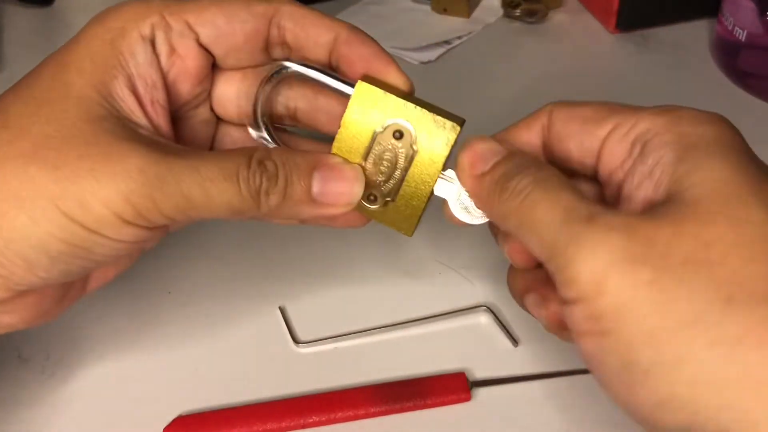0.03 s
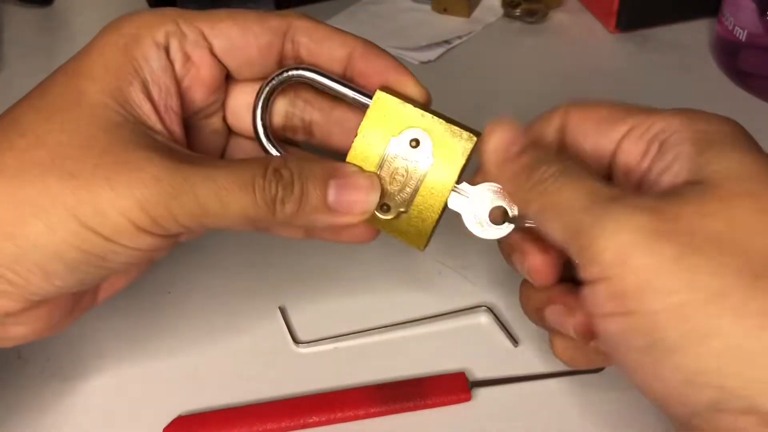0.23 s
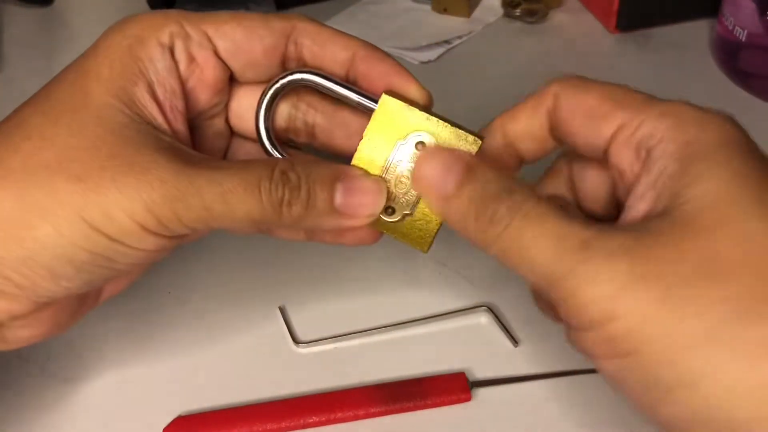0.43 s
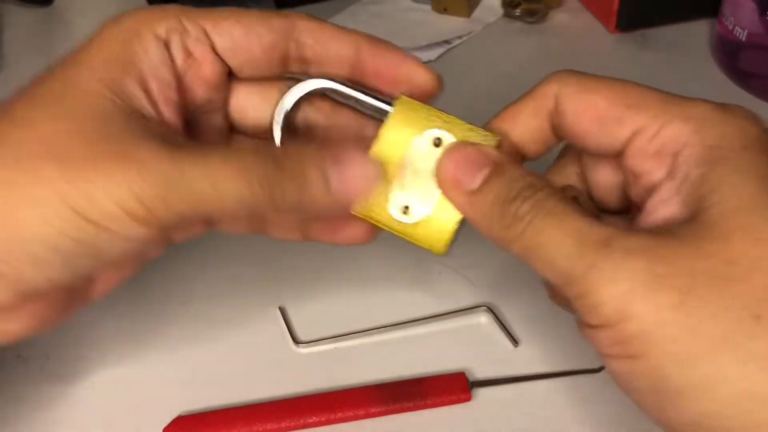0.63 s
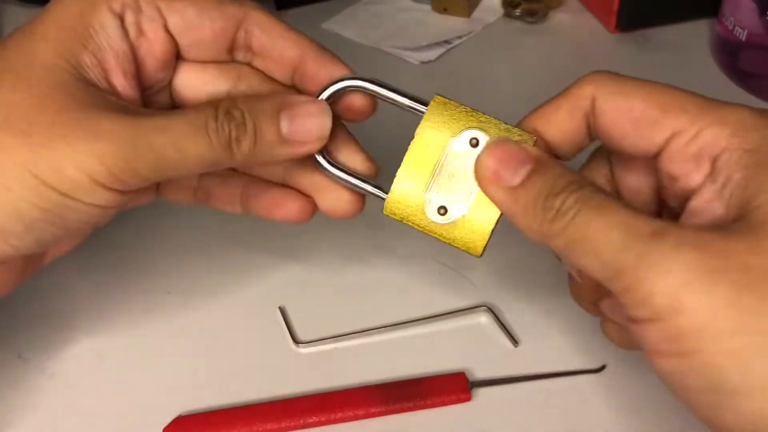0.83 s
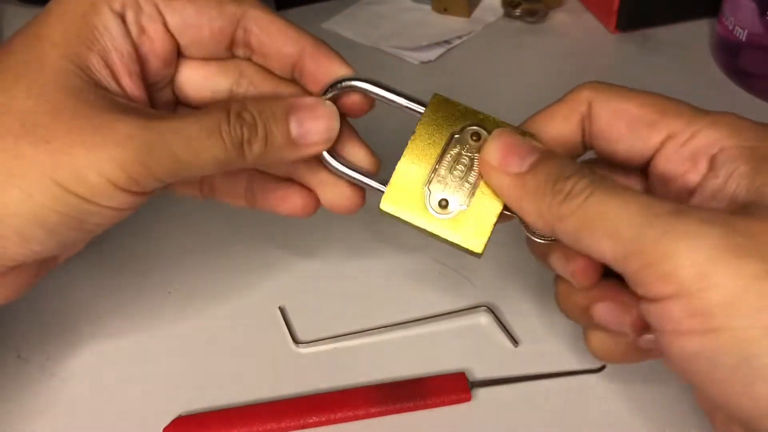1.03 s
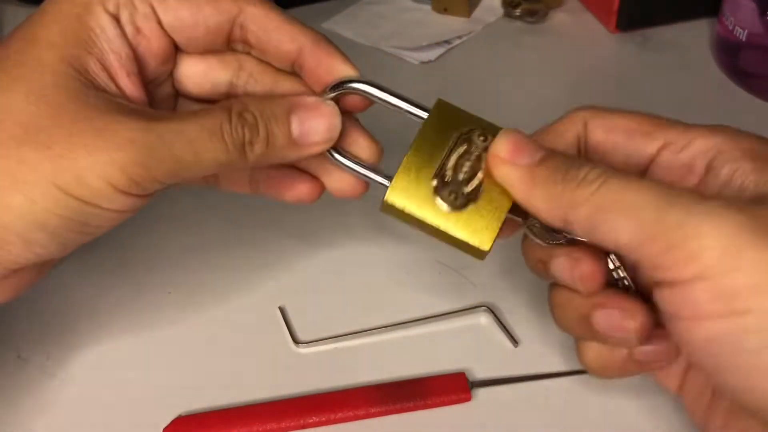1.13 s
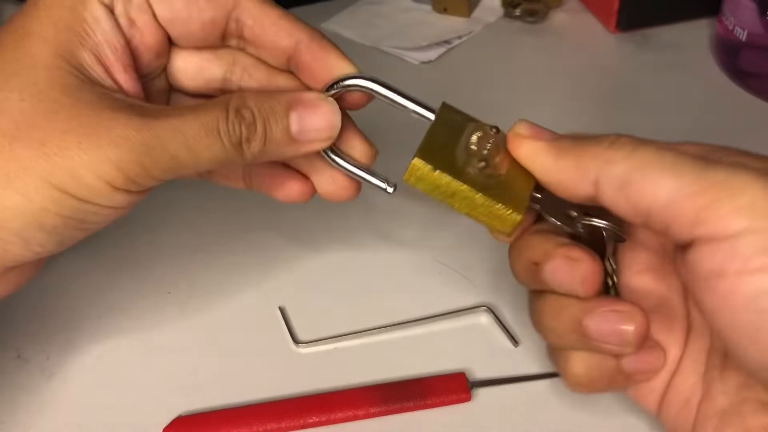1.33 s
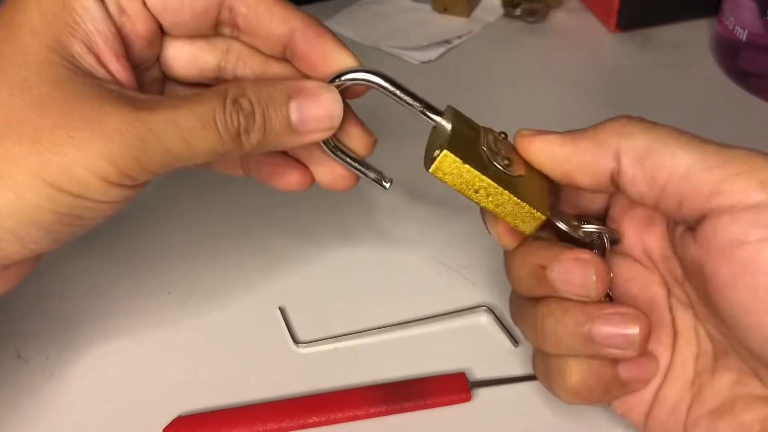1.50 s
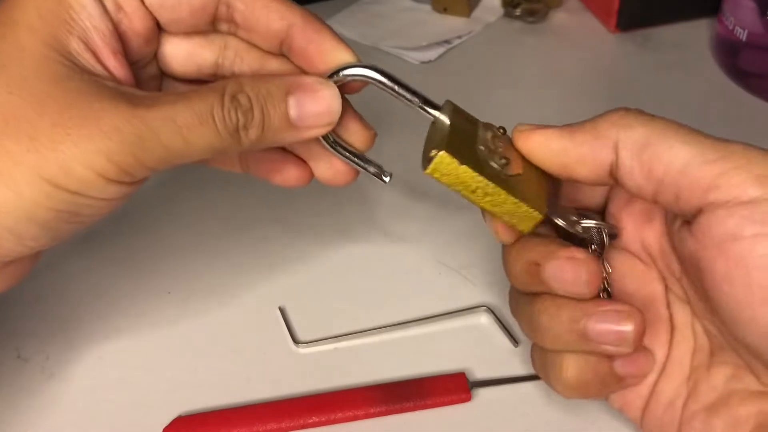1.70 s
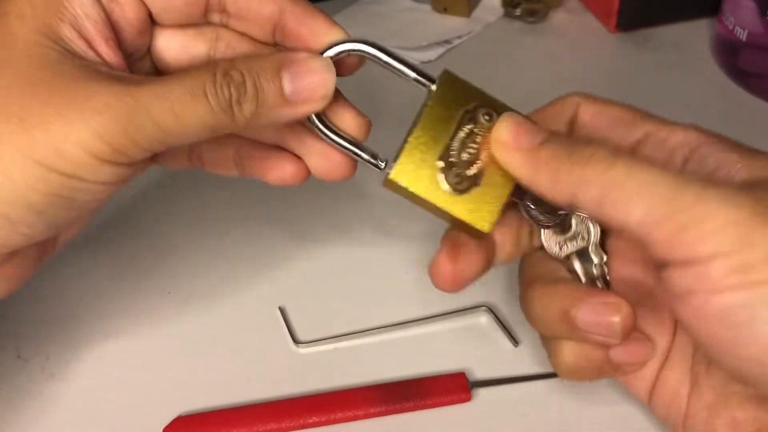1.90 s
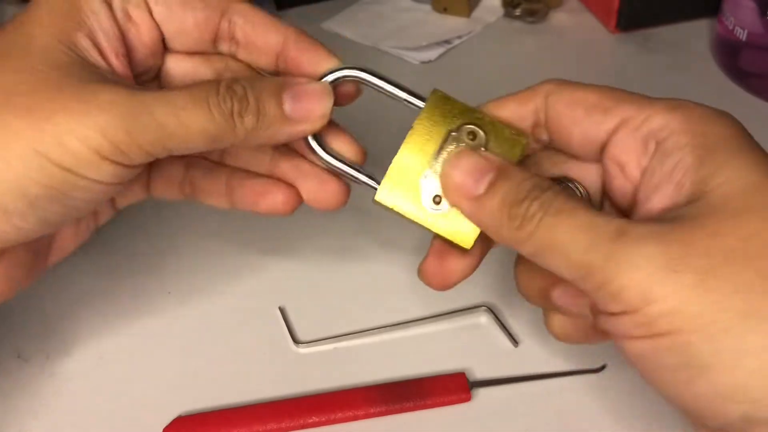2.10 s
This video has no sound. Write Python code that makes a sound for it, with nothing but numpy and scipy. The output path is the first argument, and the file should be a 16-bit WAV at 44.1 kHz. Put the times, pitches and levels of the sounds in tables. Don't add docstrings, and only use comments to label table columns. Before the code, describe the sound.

A small brass padlock snaps at 0.07 s, very bright, hard and short, and the room answers with a brief splashy tail. Faint key ticks and a slide follow at 0.26 s, firmer key taps at 1.0 s, a shackle tick at 1.2 s, then thin steel ticks and scrapes from 1.76 to 2.1 s. Soft low table bumps come at 0.5, 1.0, 1.36 and 1.54 s over faint fan hum and hiss.

```python
import sys
import numpy as np
from scipy import signal
from scipy.fft import rfft, irfft
from scipy.io import wavfile
from scipy.ndimage import uniform_filter1d

SR = 44100
rng = np.random.default_rng(int(sys.argv[2]) if len(sys.argv) > 2 else 0)


def dump_mix(stems):
    frames = np.atleast_2d(stems).T
    limited = np.clip(frames, -1, 1)
    pcm = np.round(limited * 32767).astype(np.int16)
    wavfile.write(sys.argv[1], SR, pcm)


def volts_from_db(level):
    exponent = np.asarray(level, float) / 20
    return 10 ** exponent


N = 94815
CREST_S = .0668

# f/Hz, level/dB, t60/s
BRASS_MODES = [(3400, -9, .007), (5100, -8, 0.005), (5400, -8.5, 0.0072), (6050, -11, .008),
               (8960, -5.5, 0.0072), (10500, -10.5, 0.0058), (11500, -5, 0.011), (12800, -6.5, .01),
               (14530, -6.5, 0.0045)]


def level(x, db):
    return x * volts_from_db(db) / np.sqrt(np.mean(x ** 2) + 1e-18)


def band(x, hz, width_hz):
    hz = min(hz, .45 * SR)
    return signal.lfilter(*signal.iirpeak(hz, hz / np.clip(width_hz, 5, .4 * SR), fs=SR), x)


def high_pass(x, hz):
    return signal.sosfilt(signal.butter(3, hz, "high", fs=SR, output="sos"), x)


def colour(x, points):
    points = np.array(points)
    f = np.fft.rfftfreq(len(x), 1 / SR) + 1
    gain_db = np.interp(np.log(f), np.log(points[:, 0]), points[:, 1])
    return irfft(rfft(x) * volts_from_db(gain_db), len(x))


def fall(t, t60):
    return (t >= 0) * np.exp(-np.log(1000) * np.maximum(t, 0) / max(t60, 1e-4))


def add(out, x, s):
    i = int(s * SR)
    out[i:i + len(x)] += x[:max(N - i, 0)]


def ticks(contacts, modes, ring_db, crack_t60_s=.011, strike=2):
    out = np.zeros(N)
    t = np.arange(SR // 8) / SR
    mode_hz, mode_db, mode_t60 = np.array(modes).T
    for s, db, hz, share in contacts:
        width_hz = hz * share
        crack = ((t == 0) * strike + rng.standard_normal(len(t))) * fall(t, crack_t60_s)
        for w in (width_hz, width_hz, 2.5 * width_hz):
            crack = band(crack, hz, w)
        luck = rng.standard_normal(len(mode_hz))
        near = 1 / (1 + (2 * np.log(mode_hz / hz) / share) ** 4)
        gain = near * np.sign(luck) * volts_from_db(mode_db + 3 * luck + ring_db)
        ring = sum(g * np.sin(2 * np.pi * f * t) * fall(t, d) for g, f, d in zip(gain, mode_hz, mode_t60))
        add(out, volts_from_db(db) * (crack / np.abs(crack).max() + ring), s)
    return out


def air():
    # f/Hz, level/dB per Hz
    rumble = [(25, -25.5), (60, -17.5), (170, 0.5), (500, -9.5), (1200, -11), (2600, -22.5), (6000, -37.5),
              (16000, -57.5)]
    # f/Hz, width/Hz, level/dB
    humps = [(58, 27, -65), (132.1, 22, -57.5), (184.6, 17.6, -59), (289.5, 37, -57.5), (384.9, 74, -61),
             (601, 51, -62.5), (1020, 143, -67)]
    out = level(colour(rng.standard_normal(N), rumble), -49.5)
    for hz, width_hz, db in humps:
        flicker = level(uniform_filter1d(rng.standard_normal(N), size=4000), 0)
        hump = band(band(rng.standard_normal(N), hz, width_hz), hz, width_hz)
        out = out + level(hump, db) * volts_from_db(2.5 * flicker)
    whine = volts_from_db(-86) * np.sin(2 * np.pi * 14540 * np.arange(N) / SR)
    hiss = level(rng.standard_normal(N), -77)
    return out + whine + hiss


def key():
    # t/s, peak level/dB, colour f/Hz, bandwidth/share of f
    taps = [(.0408, -47, 13500, .4), (.0435, -42, 12000, 1.6), (.0468, -76, 11500, 0.81),
            (.0500, -55, 7800, 0.45), (.0550, -44, 9000, 0.73), (.2575, -50, 8850, 0.92),
            (.2620, -42.5, 6140, 0.79), (.2648, -28.5, 14700, 0.18), (.2650, -37.5, 8530, 1.4),
            (.308, -60, 12700, 0.17), (.376, -66, 11960, 0.85), (.420, -58, 13240, .7),
            (.517, -62.5, 11970, .8), (.9948, -34, 3200, 0.29), (.9950, -31, 5630, 0.23),
            (.9953, -31, 8970, 0.11), (.9956, -35, 11600, 0.3), (.9950, -47, 2220, 0.28),
            (.9983, -41.5, 3280, 0.3), (.9983, -45, 5250, 0.22), (.9985, -45, 8900, 0.16),
            (1.0015, -48.5, 8800, .15), (1.0015, -56, 13500, .5), (1.013, -56, 3200, 0.13),
            (1.041, -58, 12800, .15), (1.0075, -48, 7500, .3), (1.0072, -54, 5200, 0.22),
            (1.0073, -55, 12500, .15), (1.1100, -51, 5600, 0.14), (1.1104, -55.5, 8900, 0.18)]
    return ticks(taps, BRASS_MODES, ring_db=-9)


def latch():
    # t/s, peak level/dB, colour f/Hz,
    # bandwidth/share of f
    hits = [(.0601, -27, 8000, 1.2), (.0637, -7, 14200, .3), (.0645, -9, 12000, .3),
            (.0662, 2.5, 11000, 1.1), (.0667, 3, 11600, .8), (.0690, -10, 12000, .3),
            (.0690, -17, 6200, .25), (.0722, -23, 7500, .3), (.0660, -27, 2000, .15),
            (.0664, -29, 2600, .15), (.0650, -28, 3500, .2), (.0700, -20, 15300, .1),
            (.0720, -23, 15300, .1), (.0712, -23, 6200, .2), (.0737, -27, 7400, .15),
            (.0797, -30, 6300, .12), (.0805, -25, 12400, .15), (.0845, -27, 12600, .1)]
    # f/Hz, width/Hz, level/dB
    resonances = [(2000, 450, -26.5), (2520, 120, -27.5), (3530, 100, -20), (4010, 170, -21),
                  (6140, 250, -9), (7500, 100, -14.5), (8770, 120, -8), (10300, 100, -12.5),
                  (11800, 170, -7), (11270, 110, -5), (12240, 60, 4.5), (13000, 91, -13), (14300, 83, -8),
                  (14700, 130, -6)]
    start_s, widen = .0599, 2.5
    t = np.arange(N) / SR
    push = rng.standard_normal(N)
    body = level(sum(volts_from_db(db) * band(push, hz, w * widen) for hz, w, db in resonances), 0)
    body = body + level(band(band(push, 9000, 12000), 9000, 12000), -11)
    body = high_pass(body, 2600)
    rise = np.clip((t - start_s) / (CREST_S - start_s), 0, 1)
    swell = (t > start_s) * volts_from_db(19 * (rise - 1))
    chatter = volts_from_db(-13) * swell * fall(np.maximum(t - CREST_S, 0), .021) * body
    contacts = ticks(hits, BRASS_MODES, ring_db=-13, crack_t60_s=.0025, strike=5)
    return high_pass(chatter + contacts, 1500)


def room_reply(x, tail, t):
    build = np.clip(t / .00062, 0, 1)
    tail = tail * (fall(t, .21) + volts_from_db(-16.5) * fall(t, .54)) * build
    return signal.fftconvolve(x, tail * volts_from_db(-14.5) / np.sqrt(np.sum(tail ** 2)))[:N]


def room(x, flat=False):
    # f/Hz, level/dB
    walls = [(1800, -39), (2900, -17), (3700, -3.5), (6000, -5), (9500, -8), (12000, -1.5), (14000, -5),
             (16000, -8.5)]
    # f/Hz, width/Hz, level/dB
    long_rings = [(3730, 110, -11), (4340, 120, -13), (5900, 350, -6), (6900, 200, -7), (7600, 250, -9),
                  (10900, 200, -8), (11300, 130, -4), (12090, 70, 0), (12650, 250, -5), (14200, 200, -9),
                  (15000, 200, -7), (15650, 120, -9)]
    t = np.arange(SR // 2) / SR - .013
    tail = rng.standard_normal(len(t))
    if not flat:
        rings = sum(volts_from_db(db) * level(band(tail, hz, w), 0) for hz, w, db in long_rings)
        patches = level(uniform_filter1d(rng.standard_normal(len(t)), size=300), 0)
        tail = (level(colour(tail, walls), 0) + level(rings, -7)) * volts_from_db(.9 * patches)
    return room_reply(x, tail, t)


def scrapes():
    # start t/s, length/s, level/dB, colour f/Hz
    slides = [
        (0.251, 0.068, -66.5, 10950),
        (0.597, 0.095, -75.5, 9930),
        (1.003, .05, -72, 8000),
        (1.25, .055, -76, 11000),
        (1.768, 0.03, -66, 11000),
        (1.856, 0.032, -66.5, 9000),
        (1.917, 0.053, -66, 12000),
        (1.951, 0.018, -54.5, 9000),
        (1.972, 0.098, -66.5, 10000),
    ]
    clicks_per_s, scatter_db = 3500, 2
    out = np.zeros(N)
    for s, length, db, hz in slides:
        chance, size = rng.random((2, int(length * SR)))
        sign = np.sign(size % .1 - .05)
        grains = (chance < clicks_per_s / SR) * volts_from_db(-scatter_db * np.log(size + 1e-9)) * sign
        x = band(grains, hz, hz)
        rub = level(band(x, hz, hz), 0)
        ring = sum(level(band(x, f, 400), -12) for f in (12800, 8850))
        add(out, level(rub + ring, db) * np.hanning(len(x)) ** .4, s)
    return out


def bumps():
    # t/s, level/dB, f/Hz, t60/s
    knocks = [
        (1.001, -27.5, 230, 0.027),
        (1.357, -30, 158, 0.058),
        (.49, -35, 194, 0.086),
        (3.1, -33.5, 190, 0.043),
        (1.541, -29.5, 131, 0.06),
    ]
    t = np.arange(N) / SR
    out = np.zeros(N)
    for s, db, hz, t60 in knocks:
        onset = np.clip((t - s) * hz, 0, 1)
        out = out + volts_from_db(db) * np.sin(2 * np.pi * hz * (t - s)) * fall(t - s, t60) * onset
    return out


def shackle():
    # t/s, peak level/dB, colour f/Hz, bandwidth/share of f
    taps = [(1.2085, -40, 12550, 0.51), (1.2090, -48.5, 4870, 0.32), (1.2087, -58.5, 8700, 0.47),
            (1.260, -68, 12700, 0.19), (1.291, -65, 12300, 0.17), (1.7587, -45, 14000, 0.18),
            (1.7615, -48, 14000, 0.23), (1.7655, -42.5, 13500, 0.074), (1.7657, -45.5, 6600, 0.36),
            (1.770, -56, 8900, .1), (1.7735, -55, 13000, .12), (1.774, -51, 5600, .4),
            (1.776, -55, 12800, 0.18), (1.777, -54, 8960, 0.15), (1.784, -50, 15300, 0.14),
            (1.805, -59, 12700, .12), (1.8255, -42, 12900, 0.18), (1.824, -51, 15600, .15),
            (1.826, -55, 4300, 0.18), (1.8315, -53, 13000, .3), (1.8318, -55, 8700, .15),
            (1.8262, -50.5, 8660, 0.2), (1.8545, -49, 13500, 0.25), (1.8560, -55, 4400, 0.15),
            (1.856, -60, 10060, 0.055), (1.8552, -51, 9200, .3), (1.870, -60, 8900, .12),
            (1.924, -63, 12800, .1), (1.934, -61.5, 12000, .4), (1.9407, -58, 12800, .15),
            (1.9452, -54, 15600, .04), (1.949, -56, 12800, .1), (1.953, -52, 9500, 0.44),
            (1.9575, -36.5, 13500, 0.18), (1.9577, -46.5, 4240, 0.21), (1.9580, -41.5, 8900, 0.29),
            (1.9645, -47.5, 12700, .3), (1.9647, -44, 8100, 0.34), (1.985, -59, 8000, .9),
            (1.993, -57, 11000, .6), (2.008, -56, 10300, .15), (2.0145, -47, 13000, .3),
            (2.0147, -42, 8100, 0.28), (2.030, -58, 8100, 0.4), (2.039, -50.5, 10400, 0.21),
            (2.0392, -62, 13400, .2), (2.050, -54, 10500, 0.36), (2.0502, -56, 15200, .15),
            (2.0504, -57, 6500, 0.61), (2.081, -64, 11910, .9), (2.129, -64, 10300, .2)]
    # f/Hz, level/dB, t60/s
    steel_modes = [(4340, -11.5, 0.014), (7100, -2, 0.0088), (8160, -1, 0.012), (8800, -5, 0.037),
                   (9700, -8.5, 0.015), (12700, 5, 0.017), (12890, -15, .06), (13240, 0, 0.0098),
                   (15500, 2, .01)]
    return ticks(taps, steel_modes, ring_db=-8)


def scene():
    small = key() + scrapes() + shackle()
    click = volts_from_db(12) * (np.arange(N) == int(CREST_S * SR))
    reply = room(click) + room(volts_from_db(-11) * small, flat=True)
    return (air() + latch() + small + reply + bumps())[None]


def low_pass(x):
    return signal.sosfilt(signal.butter(12, 16630, fs=SR, output="sos"), x)


def record(dry):
    release_s, limit_db, duck_ratio = .008, -27, .3
    k = np.exp(-1 / (release_s * SR))
    env = np.sqrt(signal.lfilter([1 - k], [1, -k], dry ** 2))
    x = dry * np.minimum(1, volts_from_db(limit_db) / (env + 1e-9)) ** duck_ratio
    x = colour(x[0], [(15750, 0), (16000, -25), (16550, -50)])[None]
    return low_pass(x)


dry = scene()
out = record(dry)
dump_mix(out)
```